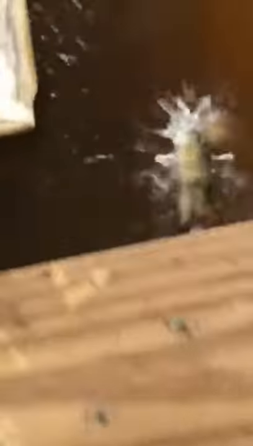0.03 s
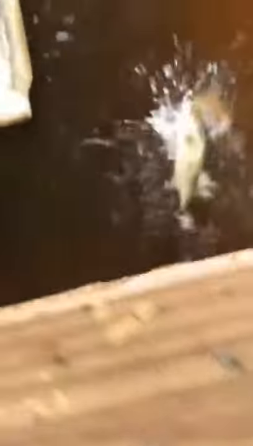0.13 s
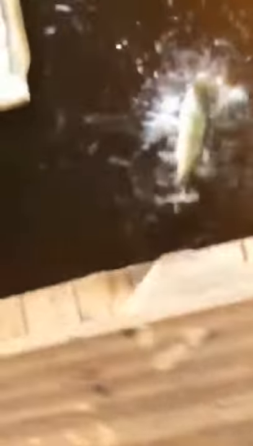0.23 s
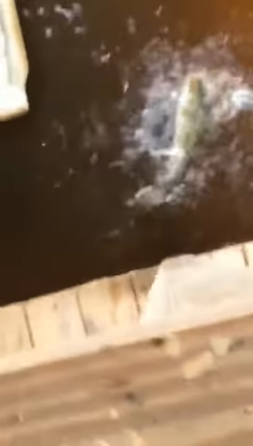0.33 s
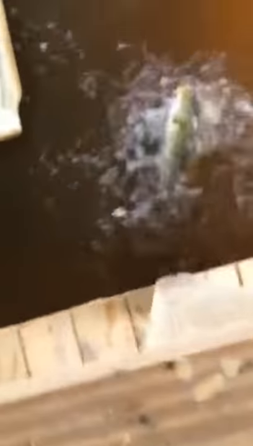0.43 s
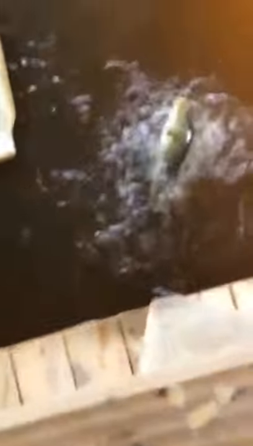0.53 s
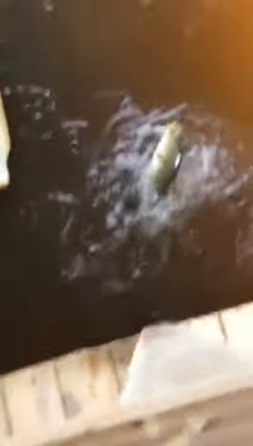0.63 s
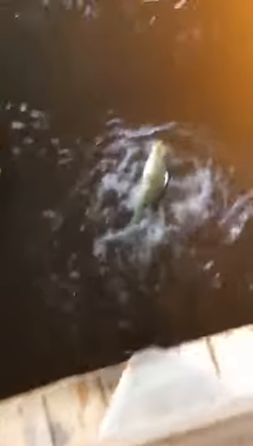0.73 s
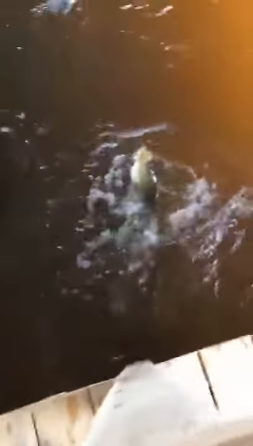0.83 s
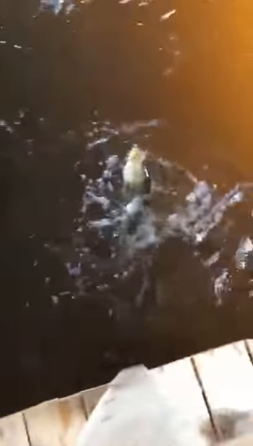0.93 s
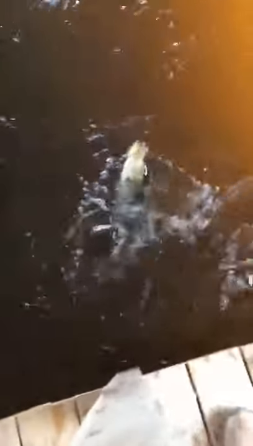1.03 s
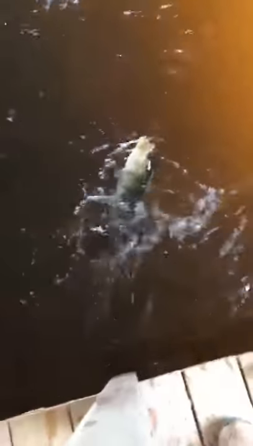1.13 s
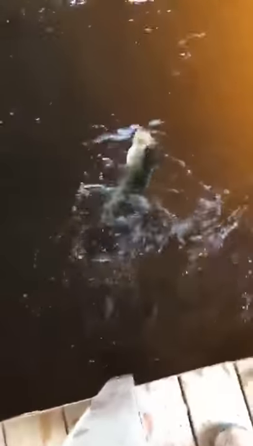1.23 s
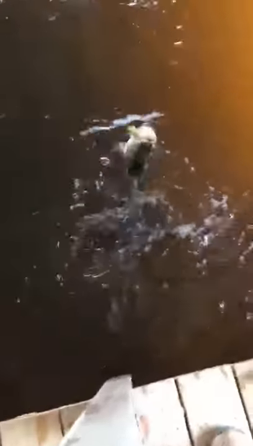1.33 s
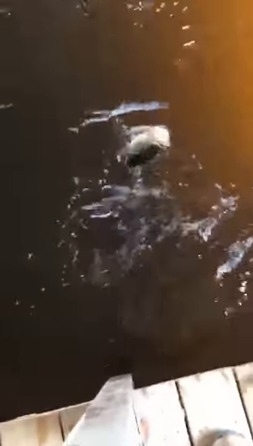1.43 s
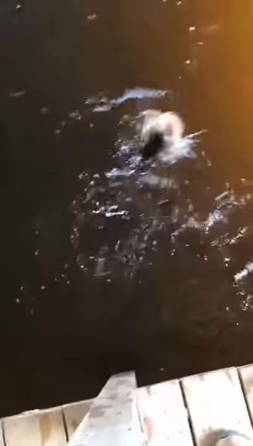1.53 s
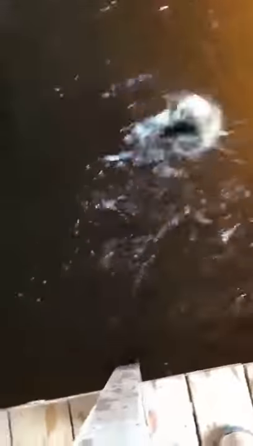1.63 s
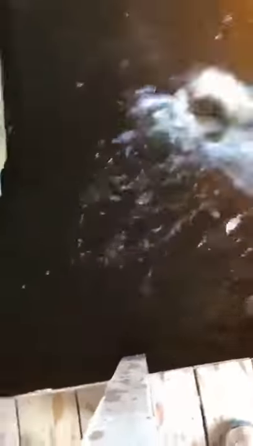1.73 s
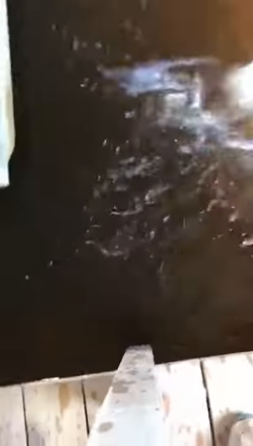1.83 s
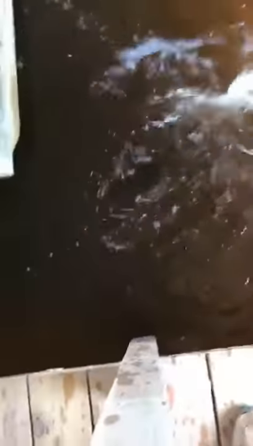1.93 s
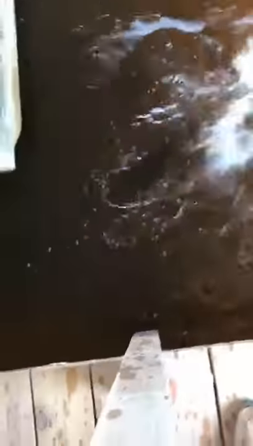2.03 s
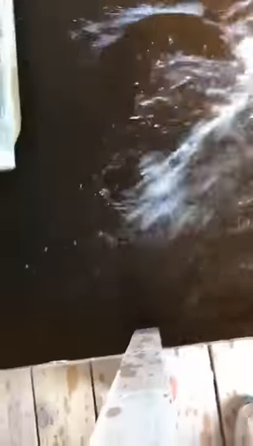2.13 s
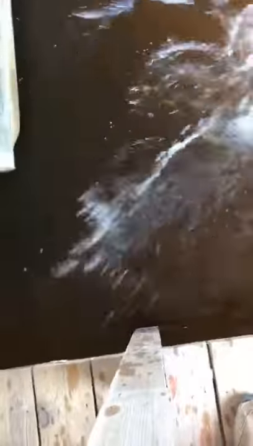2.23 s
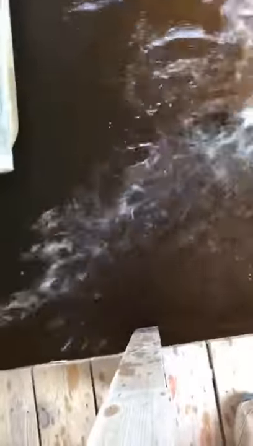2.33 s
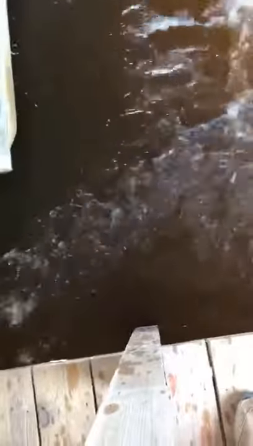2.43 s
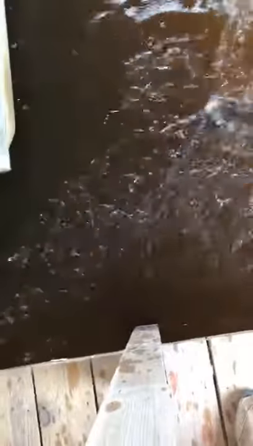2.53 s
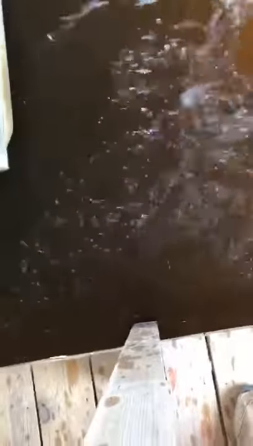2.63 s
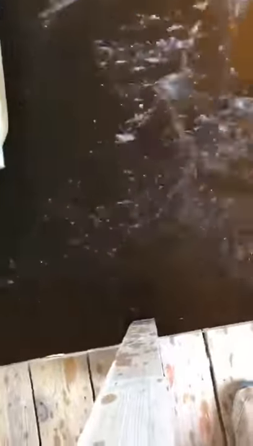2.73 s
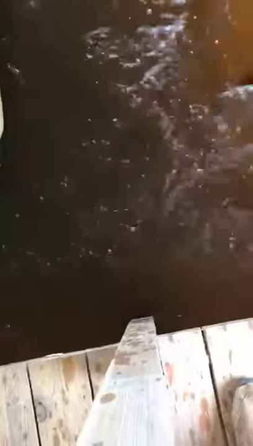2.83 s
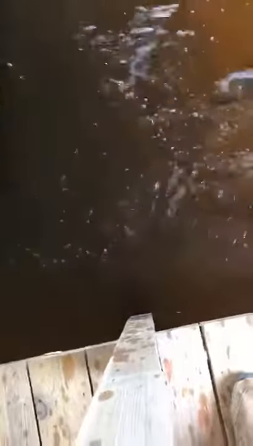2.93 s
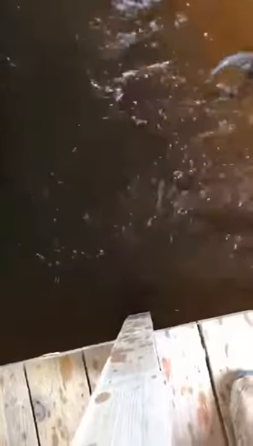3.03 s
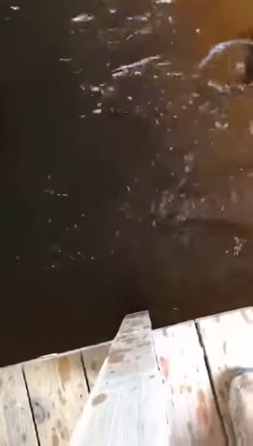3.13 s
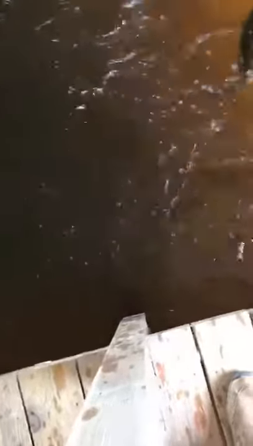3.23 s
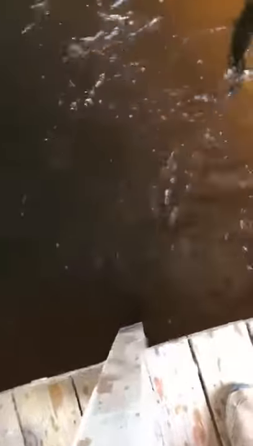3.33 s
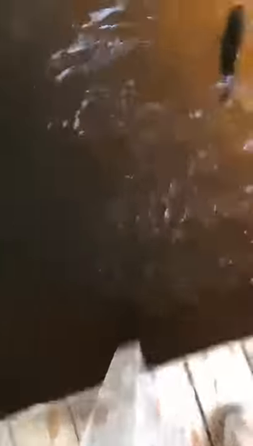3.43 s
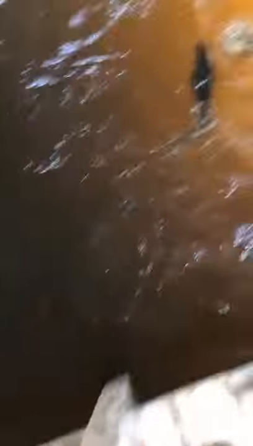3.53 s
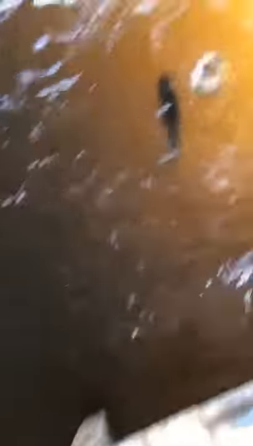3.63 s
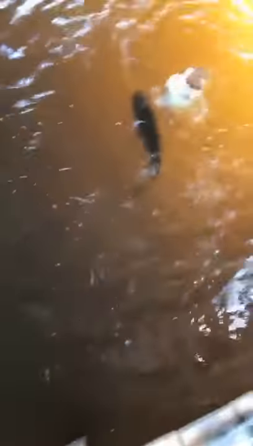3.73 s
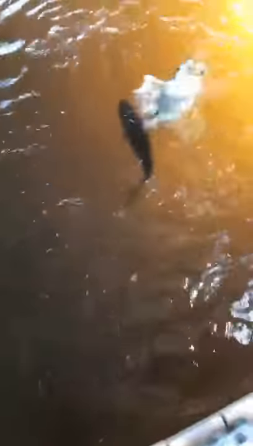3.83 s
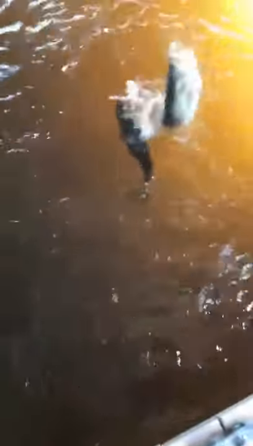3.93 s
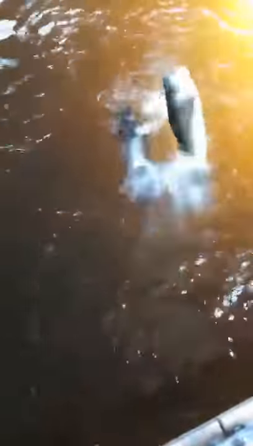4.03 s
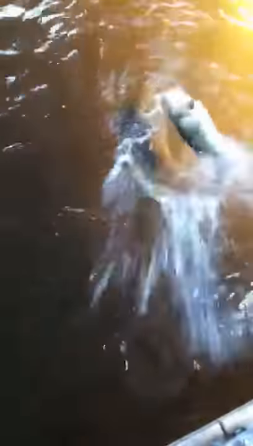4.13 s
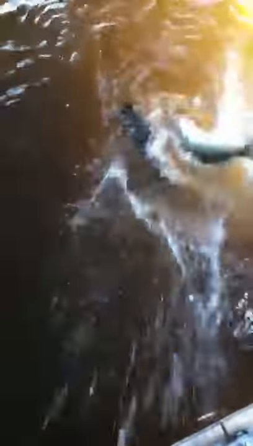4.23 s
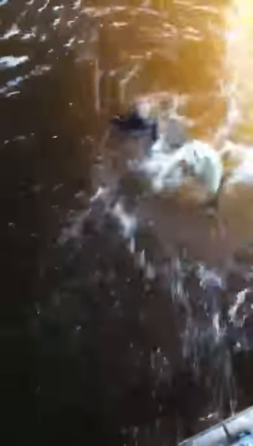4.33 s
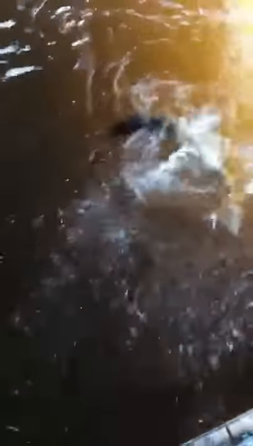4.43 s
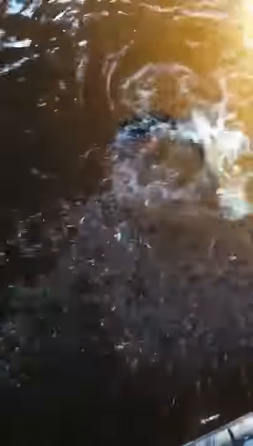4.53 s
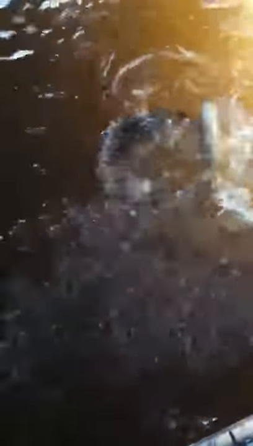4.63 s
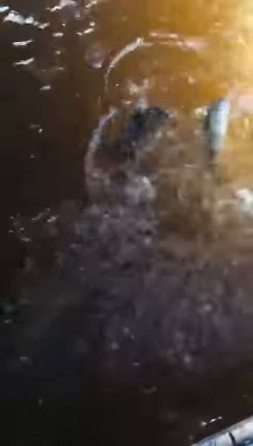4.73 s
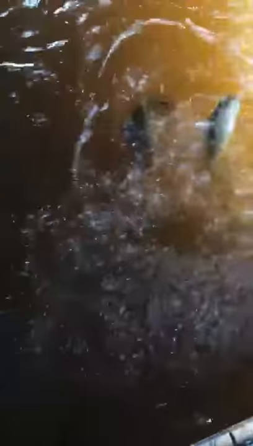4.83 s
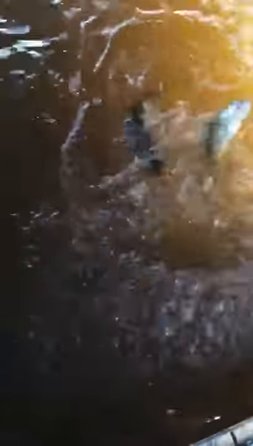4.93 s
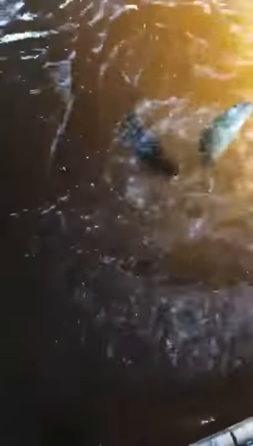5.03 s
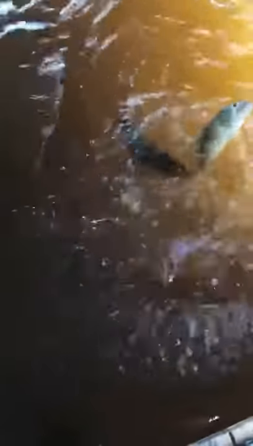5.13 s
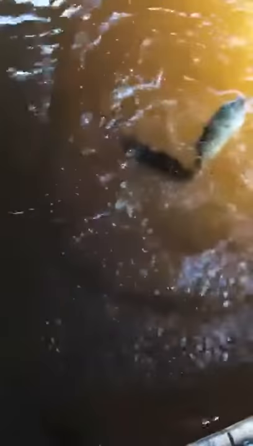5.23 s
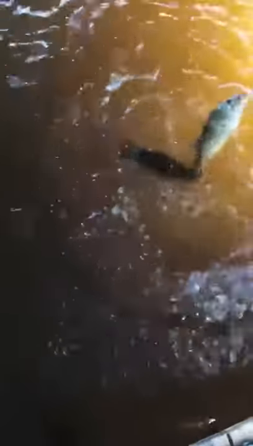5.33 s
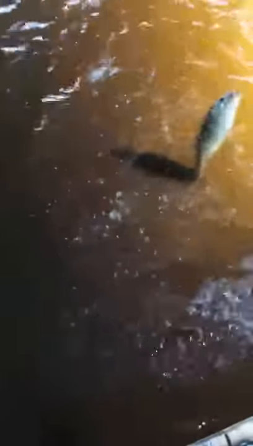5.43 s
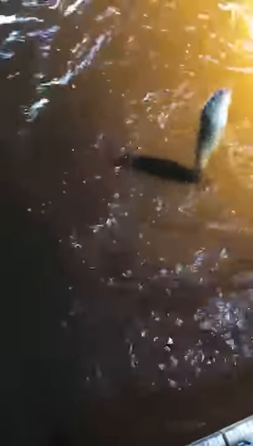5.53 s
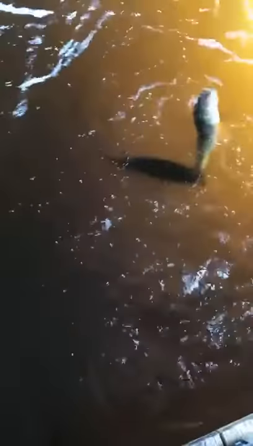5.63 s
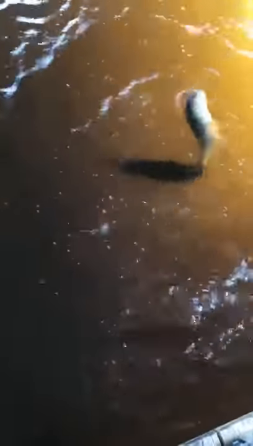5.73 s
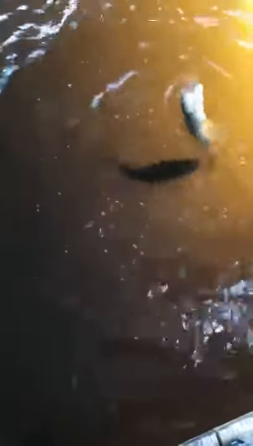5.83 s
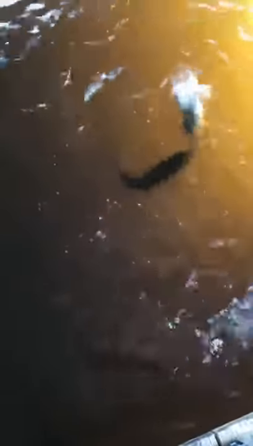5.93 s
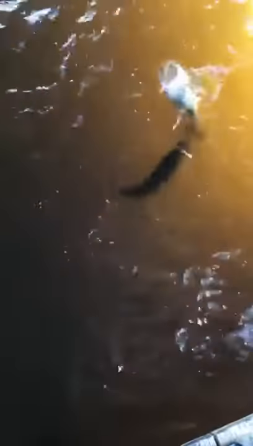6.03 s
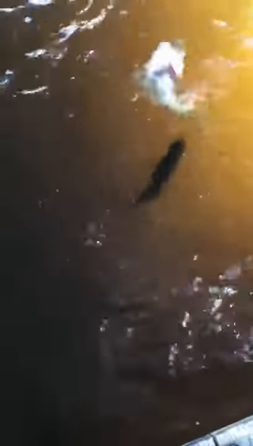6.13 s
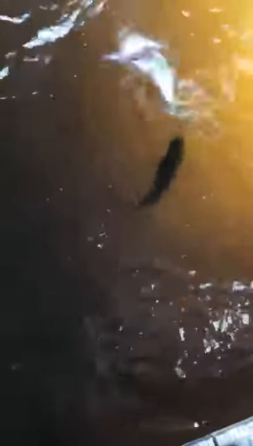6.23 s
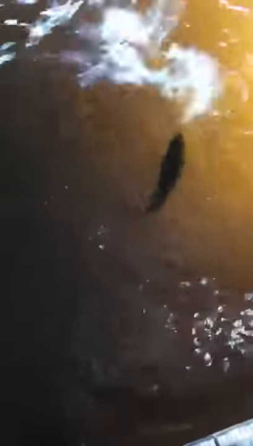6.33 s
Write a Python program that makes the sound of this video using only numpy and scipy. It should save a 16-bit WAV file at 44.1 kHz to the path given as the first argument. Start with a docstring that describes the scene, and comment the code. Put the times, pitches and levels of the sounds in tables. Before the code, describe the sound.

A hooked fish thrashes beside a wooden dock in three splashy bursts, with drips and bubbling plinks between, and a fourth starting at the end.

```python
"""Beside a wooden dock, a hooked bass thrashes at the surface in three bursts, with a fourth beginning.
Its slaps are clicks with dying noise bursts; churned-in air rings as damped sines that rise in pitch.
Spray is random ticks and soft noise in third-octave bands; single drops plink in the lulls.
The dock answers with a short decaying echo; motor-hum sines, a low drone and hiss lie underneath."""
import sys
import numpy as np
from scipy import signal
from scipy.io import wavfile

SR = 44100
rng = np.random.default_rng(int(sys.argv[2]) if len(sys.argv) > 2 else 0)


def transcribe(signal):
    """Save signal, clipped to [-1, 1], as a 16-bit WAV file at the path in sys.argv[1]."""
    frames = np.atleast_2d(signal).T
    limited = np.clip(frames, -1, 1)
    pcm = np.round(limited * 32767).astype(np.int16)
    wavfile.write(sys.argv[1], SR, pcm)


N = 281358
TIME = np.arange(N) / SR
BANDS = 62.5 * 2 ** (np.arange(22) / 3 + 1 / 12)   # third-octave centres, Hz

# Thrown water raining back: t/s, length/s, spatter level/dB, fine spray relative to spatter/dB
SHOWERS = [(-.02, .06, -53.5, 0), (.056, 0.043, -29.5, -3), (0.241, 0.059, -40.5, 2.5), (.4, 0.18, -49, 4),
           (1.109, .11, -55.5, -4.5), (1.256, 0.071, -52, -3), (1.637, 0.098, -49, -1),
           (1.737, 0.035, -41.5, 3), (1.786, 0.08, -39.5, 5), (1.945, 0.23, -38, 2.5),
           (2.24, 0.044, -39, 9), (2.323, .11, -34.5, 3.5), (2.486, 0.053, -39, 7), (2.724, 0.091, -45, -5),
           (3.3, 0.32, -67.5, -1.5), (3.802, 0.052, -61, 0), (3.895, 0.39, -58.5, 8.5),
           (4.05, 0.057, -38, 1.5), (4.166, 0.079, -48, 4.5), (4.267, 0.06, -36.5, 8),
           (4.344, .19, -35, 0.5), (4.47, 0.021, -33, 4), (4.553, 0.14, -37.5, 0), (4.744, .11, -42, 1),
           (5.002, 0.1, -52, 0.5), (6.151, 0.089, -58, 10), (6.25, 0.12, -53.5, -7), (6.335, 0.043, -44, 3)]
# The fish ploughs under and drags air down: t/s, length/s, churn level/dB
PLUNGES = [(-.02, 0.03, -38.5), (0.065, 0.02, -37), (0.264, 0.14, -44), (0.606, 0.6, -61),
           (1.152, 0.028, -42), (1.9, 0.22, -38.5), (4.26, .04, -48), (4.545, 0.15, -40.5),
           (6.28, 0.08, -55)]
# Spectrum of the stirred water: f/Hz, relative level/dB
WATER_COLOUR = [(65, -29), (130, -20), (230, -11), (350, -5), (550, -9), (800, -7), (1100, -7),
                (1700, -8.5), (2400, -9), (3500, -6.5), (5000, -9.5), (6500, -8), (8500, -10)]
# Body and tail hitting the water: t/s, thud, smack and crack relative level/dB, decay time t60/s
SLAPS = [(0.0483, -54, -38.5, -29, 0.049), (0.061, -20.5, -20, -11, 0.077), (0.267, -37.5, -47, -37, 0.083),
         (.555, -78, -50, -33, 0.057), (1.732, -45.5, -31.5, -39, 0.17), (1.878, -35, -51.5, -47, 0.07),
         (1.923, -36, -27, -60, 0.11), (1.957, -38.5, -29.5, -32, 0.31), (2.078, -41.5, -25.5, -25, 0.14),
         (2.258, -37, -34.5, -27, 0.086), (2.353, -57, -27, -51, 0.06), (4.06, -51.5, -41, -29, 0.079),
         (4.09, -61, -23.5, -46, 0.19), (4.1228, -30.5, -19, -20.5, 0.057),
         (4.1287, -26.5, -72, -15, 0.094), (4.491, -47, -32.5, -19.5, 0.053), (6.369, -56, -46, -28, 0.13)]
# Spectrum of a slap: f/Hz, relative level/dB
SLAP_COLOUR = [(65, -34), (130, -20.5), (250, -9.5), (550, -1), (780, -6.5), (1150, -4), (1700, -1.5),
               (2400, -8), (3400, -4), (5000, -13.5), (6800, -8.5), (8500, -14.5)]
# Larger drops landing on the surface: t/s, relative level/dB, centre f/Hz
DROPS = [(0.426, -38, 6500), (0.5, -40, 2200), (0.594, -42, 5900), (0.7048, -42, 4200),
         (0.9844, -41.5, 1760), (1.0947, -48.5, 1290), (1.206, -43, 5860), (1.315, -44, 2160),
         (1.544, -47, 1800), (1.6486, -43.5, 3150), (2.2263, -29, 3320), (2.648, -37, 1200),
         (2.782, -39, 1680), (3.015, -39.5, 7050), (3.299, -50.5, 2300), (3.506, -50.5, 3600),
         (3.731, -48, 4200), (3.892, -46, 5000), (5.074, -44, 5980), (5.147, -38, 3080), (5.378, -50, 5800),
         (5.798, -61, 4500), (5.934, -49, 3500), (6.16, -57, 4980)]
# Larger air pockets ringing: t/s, starting f/Hz, level/dB, decay time t60/s
BUBBLES = [(.002, 324, -35.5, 0.17), (0.0601, 1053, -13, 0.032), (.065, 600, -18, 0.041),
           (0.063, 152, -20.5, 0.058), (.069, 67.7, -35, 0.24), (.289, 307, -32.5, 0.14),
           (.387, 322, -39.5, 0.2), (.46, 828, -40, 0.13), (.556, 710, -39, .063),
           (0.589, 1098, -42.5, 0.16), (.841, 294, -41.5, 0.1), (1.095, 249, -44.5, 0.17),
           (1.158, 386, -44, 0.23), (1.184, 604, -41, 0.15), (1.278, 535, -39, 0.04),
           (1.305, 570, -41, 0.059), (1.544, 874, -48, 0.096), (1.65, 1500, -37.5, .05),
           (1.665, 673, -47, 0.078), (1.737, 1450, -26, .032), (1.803, 680, -32.5, .17),
           (1.929, 314, -27, 0.14), (1.956, 820, -24.5, 0.038), (1.986, 340, -23, 0.1),
           (2.077, 215.7, -25, 0.34), (2.145, 223, -30.5, 0.19), (2.219, 225, -29.5, 0.1),
           (2.259, 2720, -18, 0.0081), (2.305, 362, -34.5, 0.15), (2.369, 2040, -20, 0.027),
           (2.757, 970, -43, 0.12), (2.832, 1046, -40.5, 0.047), (3.07, 963, -54.5, 0.15),
           (3.31, 2020, -49, 0.13), (3.379, 3150, -41, 0.022), (3.465, 1110, -51.5, 0.086),
           (3.593, 1880, -52.5, 0.048), (3.817, 1066, -55, 0.082), (3.943, 940, -47, 0.031),
           (3.999, 876, -45, .15), (4.041, 872, -35.5, 0.097), (4.0913, 1037, -19.5, 0.034),
           (4.1239, 1206, -6, 0.011), (4.14, 1350, -13, 0.012), (4.52, 710, -26.5, 0.029),
           (4.525, 253, -28.5, .052), (4.579, 397, -20.5, .029), (4.652, 256, -28, .093),
           (4.663, 152, -34, 0.076), (4.666, 820, -30.5, 0.054), (4.707, 276, -25.5, 0.1),
           (4.805, 1007, -34, 0.065), (4.846, 668, -39, 0.16), (5.137, 1395, -40, 0.065),
           (5.242, 591, -48, 0.23), (6.11, 1126, -51, 0.18), (6.159, 1208, -41, 0.072),
           (6.2595, 1950, -35, 0.052), (6.322, 258, -40.5, 0.39), (6.334, 753, -38, 0.078)]
# Spectrum of the still air: f/Hz, level per band/dB
AIR = [(65, -73.5), (130, -75), (280, -71), (400, -84.5), (550, -82), (1200, -78.5), (2500, -81),
       (3800, -72), (5000, -78), (6500, -69), (8500, -64.5)]
# Partials of the motor hum: f/Hz, rms level/dB
HUM = [(38, -73), (58, -67.5), (75, -67.5), (117, -67.5), (145, -71.5), (233, -70.5), (292, -73.5)]
# Low drone, swelling near the end: t/s, rms level/dB
DRONE = [(0, -76.5), (3.8, -77.5), (5.2, -68), (6.0, -54.5), (6.38, -57)]

CHURN_HZ, SPATTER_HZ, SPRAY_HZ = 430, 1160, 4200   # centres of deep churn, spatter and fine spray
SWELL_S = 0.017   # time for a shower or plunge to build up
SHOWER_FALL_DB_PER_S, PLUNGE_FALL_DB_PER_S = 101, 161.5
SETTLE_DB, SETTLE_FALL_DB_PER_S = -18.5, 27.5   # slower fall of the settling surface
SHOWER_CHURN_DB = -11.5   # deep churn stirred up by a shower, relative to its spatter
# share of the soft wash, weakening of the tiniest bubbles, ring time of a 1 kHz bubble
WASH_DB, TREBLE_BUBBLES_DB, BUBBLE_T60_S = -11, -9, .038
BUBBLE_RISE_OCTAVES = 0.17   # climb of a large bubble while it dies away
# small stray bubbles surfacing all the while
STRAY_COUNT, STRAY_HZ, STRAY_SPREAD_OCTAVES = 70, 1104, .7
STRAY_DB, STRAY_SPREAD_DB, STRAY_T60_S = -53.5, 3.5, .08
# share of the spatter's swing in dB that they follow; spatter level the swing is counted from
STRAY_FOLLOWS, CALM_DB = 0.77, -63.5
DOCK_T60_S, DOCK_TREBLE_T60_S, ECHO_DB = 0.42, 0.095, -4
DRONE_HZ, CUTOFF_HZ = 51.5, 9150


def from_db(db):
    """Decibel law: the amplitude gain of a level."""
    return 10 ** (np.asarray(db) / 20)


def rms_one(x):
    """Normalisation: scale to unit mean power."""
    return x / np.sqrt(np.mean(x ** 2) + 1e-20)


def in_time(rows):
    """Linear interpolation: each column of a curve table at every sample."""
    s, *columns = np.transpose(rows)
    return [np.interp(TIME, s, column) for column in columns]


def at_hz(points, hz):
    """Logarithmic pitch: read a spectrum on a log-frequency axis."""
    points = np.array(points)
    return np.interp(np.log(hz), np.log(points[:, 0]), points[:, 1])


def blend(levels, hz):
    """Spectral interpolation: level at one pitch, between the deep, middle and fine levels."""
    anchors = np.log([CHURN_HZ, SPATTER_HZ, SPRAY_HZ])
    shares = np.eye(len(levels))
    return sum(np.interp(np.log(hz), anchors, share) * db for share, db in zip(shares, levels))


def band(x, hz, octaves=1 / 3):
    """Band-pass filtering: keep a span of octaves around a centre."""
    edges = np.minimum(hz * 2 ** (np.array([-.5, .5]) * octaves), .45 * SR)
    sos = signal.butter(2, edges, "band", fs=SR, output="sos")
    return signal.sosfilt(sos, x + 1e-18)


def noise(hz, octaves=1 / 3):
    """Filtered noise: a band of unit rms, past the filter's onset."""
    return rms_one(band(rng.standard_normal(N + SR), hz, octaves)[SR:])


def drift(rate_hz):
    """Low-passed chance: a slow random curve of unit spread, drawn every 40 samples."""
    r = np.exp(-80 * np.pi * rate_hz / SR)
    slow = signal.lfilter([1], [1, -2 * r, r * r], rng.standard_normal(N // 40 + 2002))[2000:]
    return np.interp(np.arange(N) / 40, np.arange(len(slow)), rms_one(slow))


def add(out, s, sound):
    """Superposition: mix a sound in at a time."""
    at = max(round(s * SR), 0)
    out[at:at + len(sound)] += sound[:max(N - at, 0)]


def fade(t60, attack_s):
    """Exponential decay: a quick rise and a fall through 60 dB."""
    t = np.arange(int(t60 * SR)) / SR
    return (1 - np.exp(-t / attack_s)) * np.exp(-np.log(1000) * t / t60)


def bubble(hz, t60, rise):
    """Bubble resonance: a damped sine whose pitch climbs as the air pocket nears the surface."""
    shape = fade(t60, attack_s=.5 / hz)
    pitch = hz * 2 ** (rise * np.linspace(0, 1, len(shape)))
    return shape * np.sin(2 * np.pi * np.cumsum(pitch) / SR)


def impacts(per_s, spread_db):
    """Random arrivals: clicks of uneven size, with mean power independent of the rate."""
    sizes = from_db(spread_db * np.minimum(rng.exponential(1, N), 3.5))
    signed = sizes * rng.choice([-1, 1], N)
    return signed * (rng.random(N) < per_s / SR) / np.sqrt(per_s)


def blow(t60, snap_s, white, attack_s):
    """Impact: a pressure click worth snap_s seconds of the opening power, and a dying burst of spray."""
    shape = fade(t60, attack_s)
    burst = shape * white[:len(shape)]
    burst[round(attack_s * SR)] += np.sqrt(snap_s * SR)
    return burst


def surge(s, length_s, fall_db_per_s):
    """Two-stage decay: the power of moving water swells, holds, falls and leaves the surface settling."""
    swell = np.clip((TIME - s) / SWELL_S, 0, 1)
    since_end = np.maximum(TIME - s - length_s, 0)
    main = from_db(-fall_db_per_s * since_end) ** 2
    settling = from_db(SETTLE_DB - SETTLE_FALL_DB_PER_S * since_end) ** 2
    return swell ** 2 * (main + settling)


def agitation():
    """Power summation: dB levels of churn, spatter and spray over all showers and plunges."""
    churn, spatter, spray = np.full((3, N), from_db(CALM_DB - 18.5) ** 2)
    for s, length_s, db, fine_db in SHOWERS:
        power = from_db(db) ** 2 * surge(s, length_s, SHOWER_FALL_DB_PER_S)
        churn += power * from_db(SHOWER_CHURN_DB) ** 2
        spatter += power
        spray += power * from_db(fine_db) ** 2
    for s, length_s, db in PLUNGES:
        churn += from_db(db) ** 2 * surge(s, length_s, PLUNGE_FALL_DB_PER_S)
    return 10 * np.log10([churn, spatter, spray])


def stirred_water(levels, bubbles_db=-9.0, patter_db=-15.0, rise=0.28, patchy_db=1.33, clump_db=3.5):
    """Granular texture: ringing bubbles, pattering drops and soft wash; wilder water has more grains."""
    vigour = from_db(0.55 * (levels[1] + 35.5))
    bubbles_per_s, drops_per_s = 65 * vigour, 1100 * vigour   # bubble rate at 1 kHz
    clumps = from_db(clump_db * drift(49))   # spray lands in clumps
    out = np.zeros(N)
    for k, hz in enumerate(BANDS):
        if k % 3 == 0:   # each drop size ticks over about an octave
            patter = impacts(drops_per_s, spread_db=1.5) * clumps
        # small bubbles are more numerous and die sooner than big ones
        births = impacts(bubbles_per_s * np.sqrt(hz / 1000), spread_db=2.5)
        size_class = rng.integers(0, 3, N)
        rings = np.zeros(N)
        for j, pitch in enumerate(hz * 2 ** (np.arange(-1, 2) / 9)):
            ring = bubble(pitch, BUBBLE_T60_S * np.sqrt(1000 / pitch), rise)
            rings += signal.oaconvolve(births * (size_class == j), ring)[:N]
        # bubbles weaken towards the treble, leaving more to the ticks of fine spray
        fine = at_hz([(1500, 0), (6000, 1)], hz)
        shares = from_db([bubbles_db + fine * TREBLE_BUBBLES_DB, patter_db, WASH_DB])
        ticks = (-1) ** k * rms_one(band(patter, hz))   # alternate signs join neighbouring bands
        layers = np.array([rms_one(rings), ticks, noise(hz)])
        grains = shares @ layers / np.linalg.norm(shares)
        patches_db = patchy_db * (2.0 - .5 * fine) * drift(23)
        out += grains * from_db(blend(levels, hz) + at_hz(WATER_COLOUR, hz) + patches_db)
    return out


def slaps(snap_s=0.00082, attack_s=.0007, level_db=-3.0):
    """Flat impact on water: the deep bands answer later, as the cavity opens."""
    whites = rng.standard_normal((len(SLAPS), SR))
    bursts = [blow(row[4], snap_s, white, attack_s) for row, white in zip(SLAPS, whites)]
    out = np.zeros(N)
    for k, hz in enumerate(BANDS):
        force = np.zeros(N)
        for (s, thud_db, smack_db, crack_db, t60), burst in zip(SLAPS, bursts):
            add(force, s, from_db(blend([thud_db, smack_db, crack_db], hz)) * burst)
        gain = np.sqrt(2 * SR / hz) * from_db(at_hz(SLAP_COLOUR, hz) + level_db)
        out += (-1) ** k * band(force, hz) * gain
    return out


def gulps_and_plinks():
    """Bubble resonance: the air pockets large or clear enough to be heard singly."""
    out = np.zeros(N)
    for s, hz, db, t60 in BUBBLES:
        add(out, s, from_db(db) * bubble(hz, t60, BUBBLE_RISE_OCTAVES))
    return out


def drops(t60=0.084, octaves=1.0, level_db=0.5, snap_s=0.00051, attack_s=.0018):
    """Drop impact: each is a brief band-passed tick coloured by its size."""
    out = np.zeros(N)
    for (s, db, hz), white in zip(DROPS, rng.standard_normal((len(DROPS), SR))):
        tick = band(blow(t60, snap_s, white, attack_s), hz, octaves)
        add(out, s, from_db(db + level_db) * tick * np.sqrt(SR / (2 * hz)))
    return out


def stray_bubbles(spatter_db, rise=.5):
    """Bubble resonance: small rising chirps at chance moments, louder where the water is rougher."""
    out = np.zeros(N)
    moments = (np.arange(STRAY_COUNT) + rng.random(STRAY_COUNT)) * N / SR / STRAY_COUNT
    traits = np.clip(rng.standard_normal((STRAY_COUNT, 2)), -2, 2)
    for s, (size, strength) in zip(moments, traits):
        roughness_db = np.interp(s, TIME, spatter_db) - CALM_DB
        db = STRAY_DB + STRAY_SPREAD_DB * strength + STRAY_FOLLOWS * roughness_db
        hz = STRAY_HZ * 2 ** (STRAY_SPREAD_OCTAVES * size)
        add(out, s, from_db(db) * bubble(hz, STRAY_T60_S, rise))
    return out


def dock(x, first_echo_s=0.0085, bass_db=-6.0, treble_db=-4.5):
    """Diffuse reflection: planks and posts scatter echoes, strongest mid-range and shorter in the treble."""
    t = np.arange(SR) / SR
    response = np.zeros(SR)
    for hz in BANDS:
        t60 = at_hz([(2000, DOCK_T60_S), (8000, DOCK_TREBLE_T60_S)], hz)
        decay = (t > first_echo_s) * np.exp(-np.log(1000) * t / t60)
        tail = band(rng.standard_normal(SR) * decay, hz)
        colour_db = at_hz([(250, bass_db), (900, 0.0075), (3000, 0.0038), (8000, treble_db)], hz)
        response += tail * from_db(colour_db) * np.sqrt(2 * np.log(1000) / (t60 * SR))
    return signal.fftconvolve(x, response)[:N]


def background(waver=0.24):
    """Steady noise and modulated sines: rumble, soft hiss, a wavering motor hum and a low drone."""
    rumble = from_db(-74) * noise(80, octaves=3)
    air = sum(from_db(at_hz(AIR, hz)) * noise(hz) for hz in BANDS)
    hum = np.zeros(N)
    for hz, db in HUM:
        strength = 1 + waver * drift(1.8)
        hum += from_db(db) * rms_one(strength * np.sin(2 * np.pi * hz * TIME + .5 * drift(5.1)))
    drone_tone = rms_one(np.sin(2 * np.pi * DRONE_HZ * TIME + .5 * drift(0.68)))
    drone = from_db(in_time(DRONE)[0]) * drone_tone
    return rumble + air + hum + drone


def scene():
    """Superposition: the water, its echo off the dock, and the background."""
    levels = agitation()
    water = from_db(-2.5) * stirred_water(levels) + slaps() + drops()
    water += gulps_and_plinks() + stray_bubbles(levels[1])
    echo = from_db(ECHO_DB) * dock(water)
    return (water + echo + background())[None]


def record(dry):
    """Low-pass filtering: the recorder cuts the top steeply."""
    return signal.sosfilt(signal.ellip(12, .2, 75, CUTOFF_HZ, fs=SR, output="sos"), dry)


dry = scene()
out = record(dry)
transcribe(out)
```